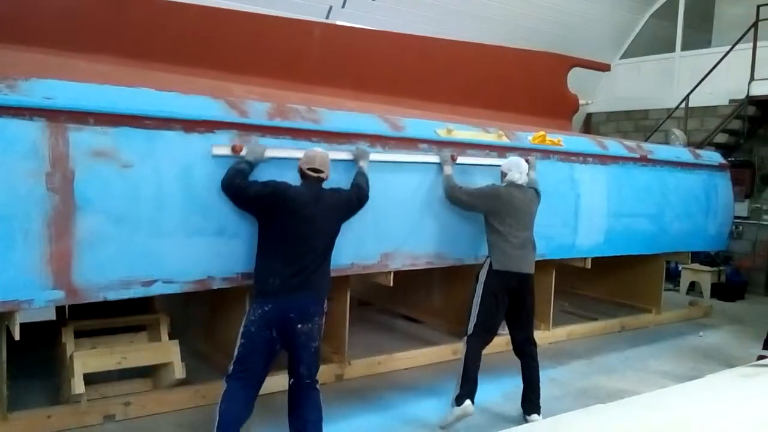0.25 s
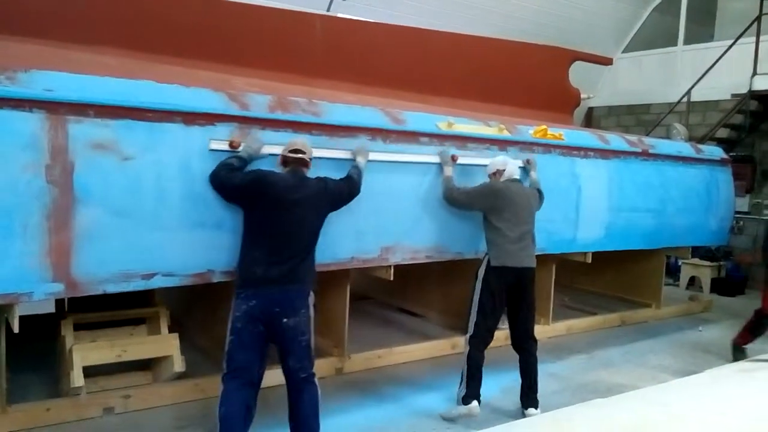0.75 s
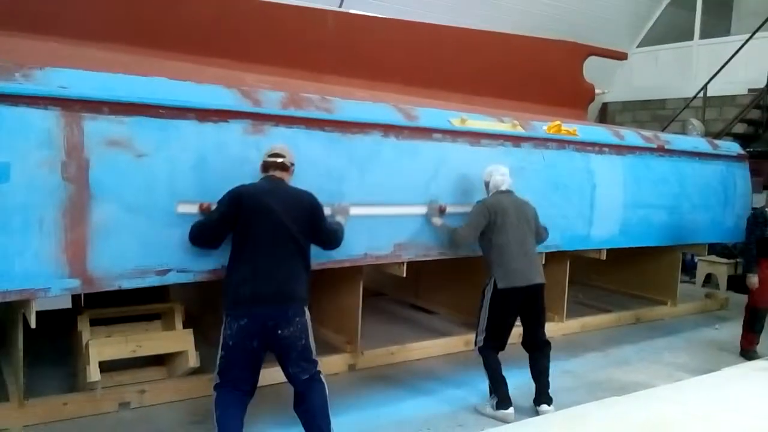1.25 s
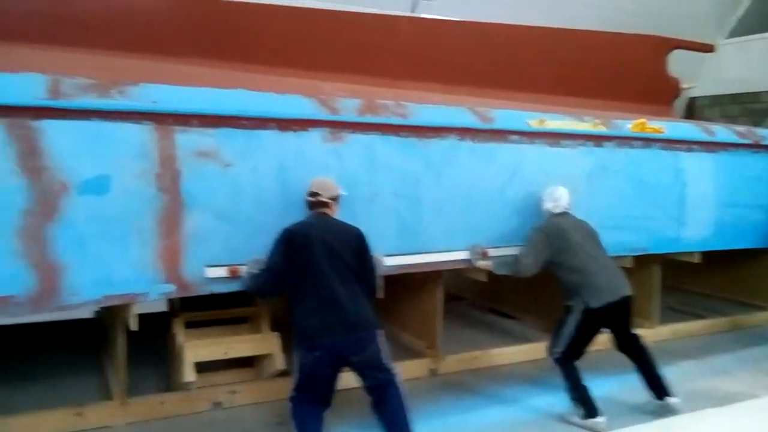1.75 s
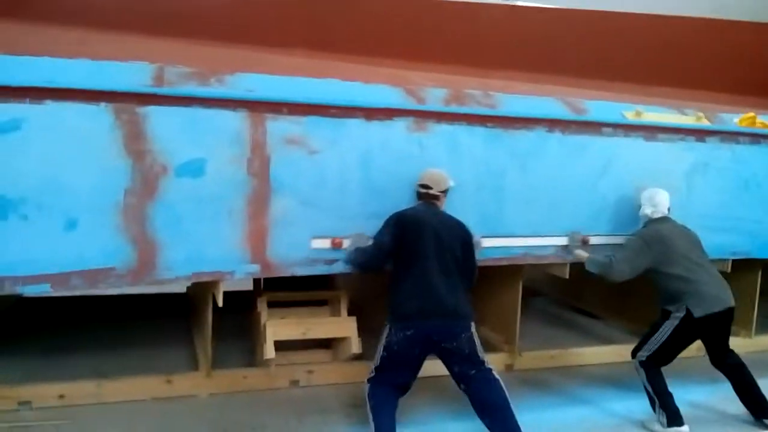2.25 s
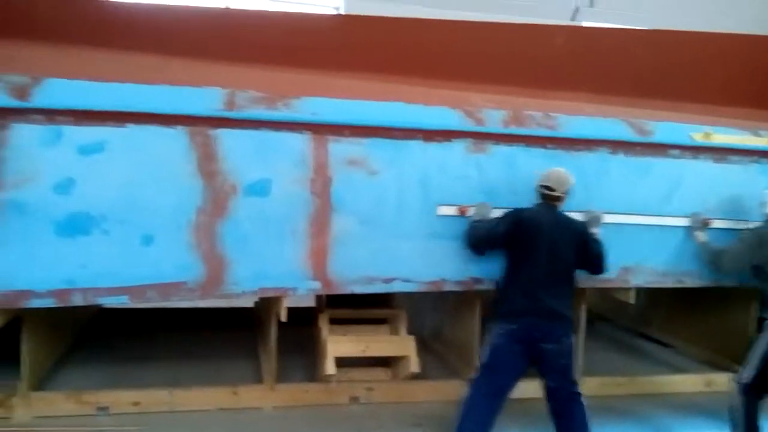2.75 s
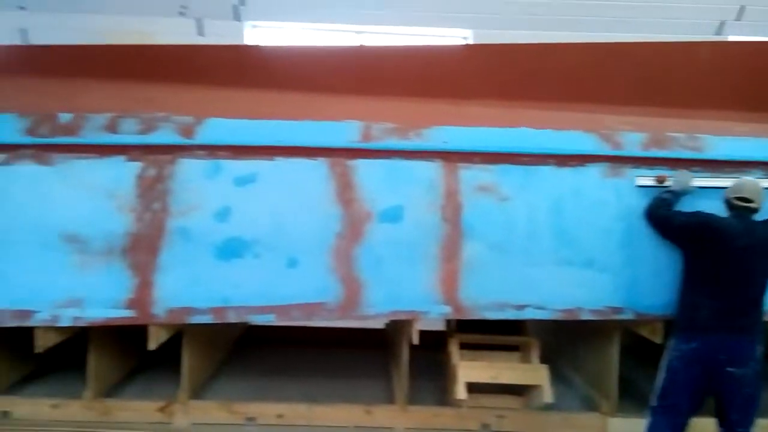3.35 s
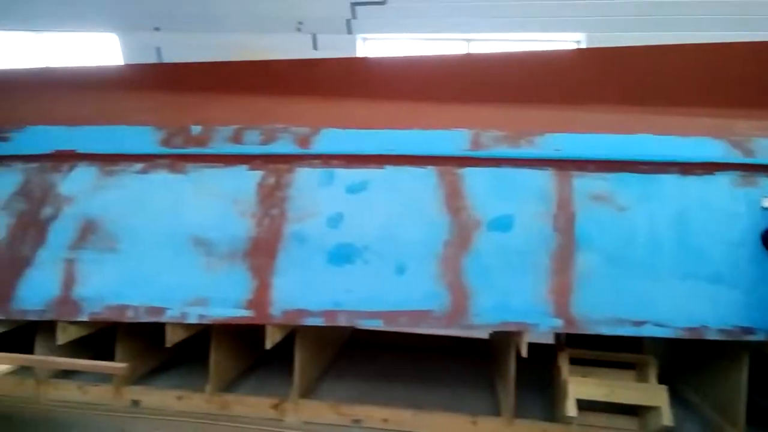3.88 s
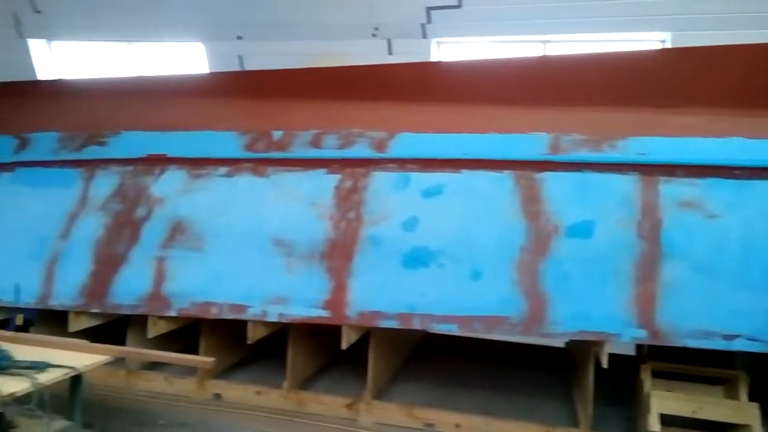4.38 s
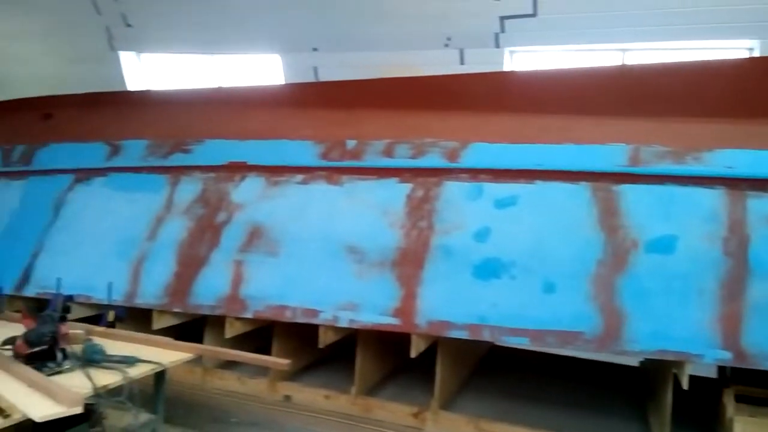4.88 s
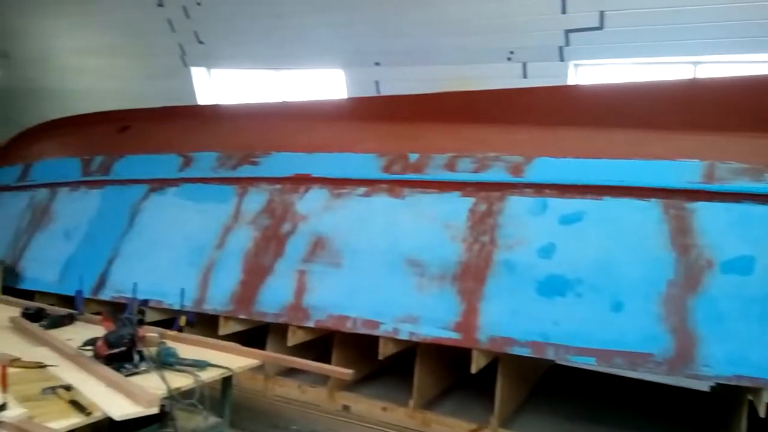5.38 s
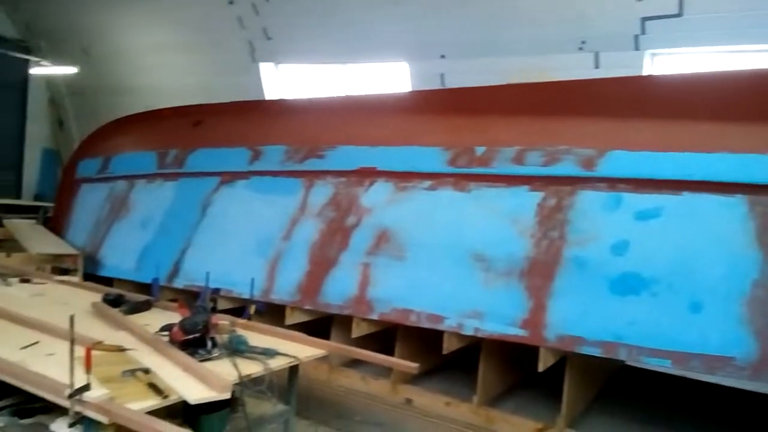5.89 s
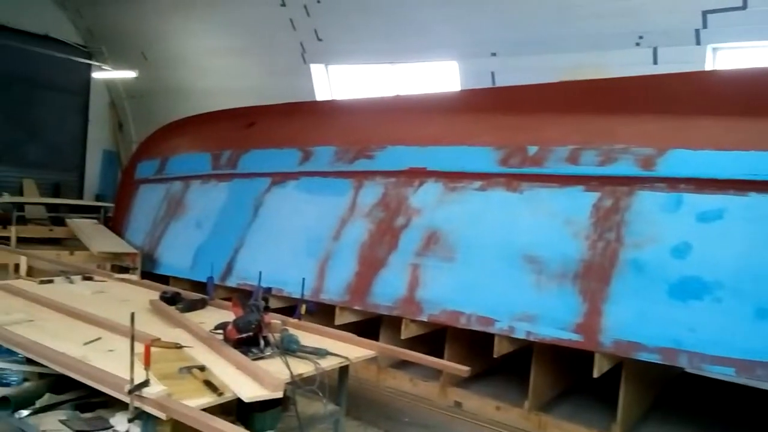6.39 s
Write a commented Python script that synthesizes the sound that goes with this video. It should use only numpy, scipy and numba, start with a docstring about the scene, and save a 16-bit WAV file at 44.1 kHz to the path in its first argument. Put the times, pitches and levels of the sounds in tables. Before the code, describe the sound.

Broad, dry sanding sweeps follow each other about every second and a half, with a faint low drumming of the hollow hull beneath. Strokes begin lightly, grow gritty and end abruptly, their echoes fading in the large shed. Midway the board snags, clacks twice or more and shudders. Slight scuffing touches and one very faint thin whistle fall in the turns. Heard from a moderate distance over quiet, steady room air.

```python
"""Sanding a boat hull

Two people push a long sanding board to and fro over the filler of a boat hull: five slow strokes in a big shed.
Each stroke lands lightly, bites, swells with speed and is pulled up; filtered grains rasp, hull modes drum.
On the third the board catches, knocks and judders (rung impulses, stick-slip jerks). A foot lands heavily once.
Decaying noise echoes fill the turns, over faint room noise and one thin whistle."""
import sys
import numpy as np
from scipy import signal
from scipy.fft import rfft, irfft, next_fast_len
from scipy.io import wavfile
from scipy.ndimage import uniform_filter1d
from numba import njit

SR = 44100
rng = np.random.default_rng(int(sys.argv[2]) if len(sys.argv) > 2 else 0)


def wrap_up_sound(samples):
    """Save the sound to the file named by the first command line argument, as 16-bit audio."""
    columns = np.atleast_2d(samples).T
    # keep every value between -1 and 1, then stretch to whole-number steps
    tamed = np.clip(columns, -1, 1)
    steps = np.round(tamed * 32767).astype(np.int16)
    wavfile.write(sys.argv[1], SR, steps)


N = 292383
T = np.arange(N) / SR

# light touches of the board at a few spots:
# (time [s], half length [s], level [dB], lowest ring [Hz], fine hiss re rasp [dB])
SPOT_TOUCHES = [(2.293, 0.057, -60.5, 2100, 0.5), (3.856, 0.094, -77, 2370, 17.5),
                (4.023, 0.053, -70, 1800, 7), (5.293, 0.063, -60, 1580, 4.5)]
# modes of board and hull shaken together: (frequency [Hz], width [Hz], relative level [dB])
SHAKEN_MODES = [(85, 20, -8), (125, 24, -9.5), (158, 26, -2), (240, 51, 1), (296, 32, 4.5), (370, 53, 0.5),
                (417, 37, 1.5), (484, 63, -3.5), (617, 78, -3), (749.6, 62, 3), (900, 100, -0.5),
                (1009, 75, 1.5), (1084.5, 104, -1), (1190, 35, 2.5), (1287, 180, -6.5), (1500, 160, -18),
                (1720, 57, 0)]


def sanding():
    """Thousands of grit tips tear at the filler; the long board grips unevenly along its length."""
    # grit heard through the board: (frequency [Hz], gain [dB])
    rasp_spectrum = [(240, -58.5), (400, -24), (466, -22.5), (503, -14.5), (808, -11), (956, -10),
                     (1730, -3), (1930, -2.5), (2580, -1.5), (3720, -3), (5210, -9), (6760, -18),
                     (8000, -18.5), (10500, -37), (15400, -43.5)]
    # the board's own rings: (frequency [Hz], width [Hz], mean level re rasp [dB])
    board_modes = [(743, 124, -8), (1476, 170, -17.5), (1710.5, 41, -11.5), (2215, 91, -10.5),
                   (2550, 110, -14), (3880, 61, -22)]
    # grit digs deeper or skips: (time [s], half length [s], added level [dB])
    digs = [(0.256, 0.028, 1.5), (1.106, 0.027, 2), (2.805, .055, 3.5), (4.205, 0.044, 1.5),
            (4.686, 0.018, -3.5), (5.454, 0.0227, 1.5)]
    # rings of the loosely held board: (multiple of the lowest ring [-])
    touch_ratios = (0.98, 1.78, 3.1)
    board_wander_db = 4
    sing_width_hz, sing_octaves_per_db = 700, 0.8  # strongest resonance sinks as the board slows
    # fine hiss re rasp: dB gained per dB of pressure or speed lost
    hiss_per_lightness, hiss_per_slowness = 0.52, 0.26
    touch_ring_db, touch_ring_width_hz = -2.5, 130

    landed, pressure_db, speed_db, (rasp_db, hollow_db, _, fine_db, hz, sing_db) = arms()
    fine_grit = grains(rate=16000, spread_db=3)
    coarse_grit = grains(rate=350, spread_db=2.0)
    grit = unit(fine_grit + undb(-11) * coarse_grit)
    grip_db = 0.43 * walk(rate=40) + 0.14 * walk(rate=14)
    tearing = colour(grit, rasp_spectrum)
    # the rings come and go as the contact moves
    rings = sum(ring(tearing, [mode]) * undb(board_wander_db * walk(rate=12)) for mode in board_modes)
    rasp = unit(tearing + rings) * undb(grip_db)
    hollow, rest = split(rasp, 1280)
    middle, hiss = split(rest, 8450)

    sing_hz = hz * 2 ** (sing_octaves_per_db * speed_db + 0.08 * walk(rate=6.2))
    singing = undb(sing_db) * moving_band(rasp, sing_hz, float(sing_width_hz))
    dig_db = sum(db * swell(centre, half_s) for centre, half_s, db in digs)
    # hollow register follows pressure alone, rasp pressure and speed; a light slow slide is mostly fine hiss
    fine = hiss * undb(fine_db - hiss_per_lightness * pressure_db - hiss_per_slowness * speed_db)
    bright = undb(rasp_db + speed_db) * (undb(dig_db) * (middle + singing) + fine)
    out = landed * undb(pressure_db) * (undb(hollow_db) * hollow + bright)

    for centre, half_s, db, touch_hz, hiss_db in SPOT_TOUCHES:
        modes = [(ratio * touch_hz, ratio * touch_ring_width_hz, touch_ring_db) for ratio in touch_ratios]
        loose = sum(ring(rasp, [mode]) for mode in modes)
        scrape = hollow + middle + loose + undb(hiss_db) * hiss
        out = out + undb(db) * swell(centre, half_s) * scrape
    return out


def arms():
    """Each stroke lands, is pressed home, speeds up, slows, brakes and lifts: pressure, speed and tone."""
    # strokes: (brake time [s], slide before it [s], pressing in [s], fastest before braking [s],
    # coasting after braking [s], slowing [dB/s^2], rasp [dB], hollow register [dB], hull drumming [dB],
    # fine hiss re rasp [dB], board resonance [Hz], resonance re rasp [dB])
    strokes = [(0.41, 1.0, .4, 0.34, 0.038, 45, -41, -45.5, -74, -4, 2350, -12.5),
               (1.809, 1.064, 0.35, 0.44, 0.04, 24.5, -44.5, -47.5, -71, -0.5, 3350, -13.5),
               (3.41, 1.193, .22, 0.42, 0.07, 22.5, -40, -42, -69.5, -1, 2240, -6.5),
               (4.85, 1.12, .39, 0.45, 0.083, 35, -46, -53.5, -74, 3.5, 2830, -5),
               (6.285, 0.9673, 0.1413, .25, 0.1027, 20.5, -41, -44.5, -67.5, -2, 2830, -13)]
    first_touch_db, release_db_per_s = -27, 184
    landing_s, brake_db, brake_s = 0.05, -7, 0.0372

    rows = np.array(strokes)
    starts = rows[:, 0] - rows[:, 1]
    current = np.searchsorted(starts[1:], T)
    brake, _, pressing, lead, coasting, slowing, *tone = rows[current].T
    start = starts[current]
    bite, fastest, lift = start + pressing, brake - lead, brake + coasting
    lightness = np.clip(1 - since(start) / pressing, 0, 1)
    pressure_db = first_touch_db * lightness - release_db_per_s * since(lift)
    slide_db = -slowing * np.square(np.clip(T, bite, lift) - fastest)
    speed_db = slide_db + brake_db * np.minimum(since(brake) / brake_s, 1)
    landed = np.minimum(since(start) / landing_s, 1)
    return landed, pressure_db, speed_db, tone


def reflections(x):
    """Hull and floor send back close copies; their lags drift, so the rasp's colour shifts."""
    touch_reflection = 0.17
    # few spots of contact give clearer reflections and a hollower scrape
    touching = sum(swell(centre, half_s) for centre, half_s, *_ in SPOT_TOUCHES)
    share = 0.09 + touch_reflection * touching
    mean_lags_s = (0.0013, 0.0023, 0.0037)
    copies = sum(delayed(x, lag_s * (1 + 0.069 * walk(rate=1.5))) for lag_s in mean_lags_s)
    return x + share * split(copies, 7600)[0]


def hull_drum():
    """Bumps in the filler shake the hull's panels, more so the harder the board bears on them."""
    # hollow hull under steady rubbing: (frequency [Hz], width [Hz], relative level [dB])
    hull_modes = [(104.8, 47, -16), (179.6, 32, 2), (217, 61, 0.5), (300, 54, 1), (389, 86, -3.5)]
    # soft bumps as the pair shift their weight: (time [s], level [dB])
    bumps = [(.47, -71), (.85, -70), (1.14, -65), (1.84, -65.5), (1.98, -71), (2.23, -76), (4.18, -66.5),
             (4.31, -67), (4.58, -67), (4.84, -68.5)]
    bump_half_s = 0.042
    drum_per_pressure, drum_wander_db = 0.58, 3  # dB per dB; unevenness

    landed, pressure_db, _, (_, _, drum_db, *_) = arms()
    panels = ring(grains(rate=1200, spread_db=4), hull_modes)
    panels = colour(panels, [(50, 0), (90, 2.5), (160, 0.5), (420, -0.5), (1000, 2)])
    rubbed_db = drum_db + drum_per_pressure * pressure_db + drum_wander_db * walk(rate=14)
    rubbed = landed * undb(rubbed_db)
    bumped = sum(undb(db) * swell(centre, bump_half_s) for centre, db in bumps)
    return unit(panels) * np.hypot(rubbed, bumped)


def judder():
    """After a catch the board sticks and slips in uneven jerks that ring board and hull, then die or lift."""
    # catches: (time [s], level [dB], decay [dB/s])
    catches = [(2.679, -40, 24.5), (2.955, -41, 49), (3.001, -34.5, 56.5)]
    rise_s = 0.0178

    _, pressure_db, _, _ = arms()
    jerk_hz = 36 * np.exp(0.3 * walk(rate=30))
    phase = np.cumsum(jerk_hz) / SR % 1
    jerks = (0.99 + np.exp(-phase / 0.14)) * grains(rate=5000, spread_db=3)
    body = ring(jerks, SHAKEN_MODES)
    body = colour(body, [(35, -28.5), (75, -8.5), (1800, 3.0), (4000, -5.5), (9000, -30)])
    shaking = []
    for start, db, fall in catches:
        rise = np.minimum(since(start) / rise_s, 1)
        shaking.append(rise * undb(db - fall * since(start)))
    return unit(body) * np.linalg.norm(shaking, axis=0) * undb(pressure_db)


def knocks():
    """The board's edge clacks on the hull and bounces once; the panels' boom swells more slowly."""
    # knocks, peaks before the shed mix:
    # (time [s], clack peak [dB], clack pitch [Hz], first ring width [Hz], boom peak [dB])
    hull_knocks = [(2.691, -27, 839, 170, -35), (2.952, -21, 1020, 418, -27.5),
                   (3.015, -38, 766, 260, -31.5), (3.051, -26.5, 1120, 600, -33)]
    bounce_s = 0.00436
    out = np.zeros(N)
    for start, clack_db, hz, width, boom_db in hull_knocks:
        blow = signal.unit_impulse(SR // 2) + 0.047 * contact(rise_s=0.0017)
        rung = ring(blow, [(hz, width, 0)])
        clack = peak(ring(rung, [(hz, 1.3 * width, 0)]), clack_db)
        add(out, start, clack)
        add(out, start + bounce_s, 0.75 * clack)
        panels, _ = split(ring(contact(rise_s=0.0081), SHAKEN_MODES), 1244)
        add(out, start, peak(panels, boom_db))
    return out


def steps():
    """One heavy footfall: soft rough contacts ring the floor's low modes in close succession."""
    # contacts of the foot, peaks before the shed mix: (time [s], peak [dB])
    footfalls = [(1.716, -51), (1.744, -55.5), (1.803, -56)]
    floor = [(86.5, 25, -1), (126.6, 24.5, 1.0), (169, 52, -1)]
    out = np.zeros(N)
    for start, db in footfalls:
        thump, _ = split(ring(contact(rise_s=0.012), floor), 273)
        add(out, start, peak(thump, db))
    return out


def whistle():
    """A faint thin whistle, a slightly unsteady sine, in the turn before the third stroke."""
    hz = 8410 + 6 * walk(rate=40)
    tone = np.sin(2 * np.pi * np.cumsum(hz) / SR)
    return undb(-92) * swell(2.125, 0.094) * tone


def shed(x, wet_db, count=1):
    """Direct sound plus echo at constant power; a moving source passes through count echo patterns."""
    place = np.linspace(0, count - 1, N)
    echo = np.zeros(N)
    for k in range(count):
        share = np.sqrt(np.maximum(1 - np.abs(place - k), 0))
        echo += signal.oaconvolve(x * share, shed_tail())[:N]
    return (x + undb(wet_db) * echo) / np.hypot(1, undb(wet_db))


def shed_tail():
    """One diffuse echo of the shed, energy near 1; its treble dies first."""
    t60_low_s, t60_mid_s, t60_top_s = 0.95, 0.78, 0.25
    t = T[:SR]
    low, rest = split(rng.standard_normal(SR), 850)
    mid, top = split(rest, 3700)
    bands = ((low, t60_low_s), (mid, t60_mid_s), (top, t60_top_s))
    tail = sum(band * np.exp(-np.log(1000) * t / t60_s) for band, t60_s in bands)
    build_up = np.clip(t / 0.015, 0, 1)
    return tail * build_up * np.sqrt(2 * np.log(1000) / (t60_mid_s * SR))


def air():
    """Faint room noise, nearly steady: coloured noise with a slow level wander."""
    # still air of the shed: (frequency [Hz], gain [dB])
    air_spectrum = [(25, 4.5), (60, -24), (120, -12), (200, -1.5), (450, -7), (1000, -7), (2500, -7.5),
                    (5000, -16.5), (8000, -23.5), (10500, -40), (15500, -38)]
    mean_db = -72.5
    wander_db = 0.6 * walk(rate=3.5)
    return unit(colour(rng.standard_normal(N), air_spectrum)) * undb(mean_db + wander_db)


def undb(db):
    """Decibels to gain."""
    return 10 ** (np.asarray(db) / 20)


def unit(x):
    """Scale to rms 1."""
    return x / np.sqrt(np.mean(x ** 2))


def peak(x, db):
    """Scale to a peak level."""
    return x * undb(db) / np.max(np.abs(x))


def walk(rate):
    """Slow random wander, rms 1: random steps, rate a second, smoothed twice."""
    k = max(int(SR / rate), 1)
    held = np.repeat(rng.standard_normal(N // k + 1), k)
    return unit(uniform_filter1d(uniform_filter1d(held, k), k)[:N])


def grains(rate, spread_db):
    """Tiny impacts at random moments, rate a second, of scattered size and either sign."""
    hit = rng.random(N) < rate / SR
    sign = np.sign(rng.standard_normal(N))
    return unit(hit * sign * undb(spread_db * rng.standard_normal(N)))


def contact(rise_s):
    """A short rough push: noise under an envelope that swells to 1 and dies away."""
    age = T[:SR // 2] / rise_s
    return age * np.exp(1 - age) * rng.standard_normal(len(age))


def colour(x, points):
    """Filter by a spectrum of (frequency [Hz], gain [dB]) points."""
    hz, db = np.transpose(points)
    size = next_fast_len(len(x) + SR // 10)
    f = np.maximum(np.fft.rfftfreq(size, 1 / SR), 1)
    gain = undb(np.interp(np.log(f), np.log(hz), db))
    return irfft(rfft(x, size) * gain, size)[:len(x)]


def split(x, hz):
    """The parts below and above a frequency; they sum to the whole."""
    lowpass = signal.butter(2, min(hz, SR / 2 - 1), fs=SR, output="sos")
    low = signal.sosfiltfilt(lowpass, x)
    return low, x - low


def ring(x, modes):
    """Drive damped resonances (Hz, width Hz, dB); neighbours swing in opposite senses."""
    out = np.zeros(len(x))
    for k, (hz, width, db) in enumerate(modes):
        b, a = signal.iirpeak(hz, hz / width, SR)
        out += (-1) ** k * undb(db) * signal.lfilter(b, a, x)
    return out


@njit
def moving_band(x, hz, width):
    """A resonance whose centre moves; gain 1 at the centre."""
    y, b, l = np.empty(len(x)), 0., 0.  # output, band and low-pass states
    for i in range(len(x)):
        g, k = np.tan(np.pi * hz[i] / SR), width / hz[i]
        v = (b + g * (x[i] - l)) / (1 + g * (g + k))
        b, l, y[i] = 2 * v - b, l + 2 * g * v, k * v
    return y


def delayed(x, lag_s):
    """The sound a fixed or moving lag later."""
    return np.interp(T - lag_s, T, x)


def swell(centre, half_s):
    """A flat-topped window in time."""
    return np.exp(-((T - centre) / half_s) ** 4)


def since(start):
    """Seconds since a moment; zero before it."""
    return np.maximum(T - start, 0)


def add(out, start, sound):
    """Mix a short sound in at a time."""
    i = int(start * SR)
    out[i:i + len(sound)] += sound[:N - i]


def scene():
    """All sources in the shed; rubbing travels through six echo patterns, thumps share one."""
    rubbing = reflections(shed(sanding(), wet_db=-7.5, count=6))
    thumps = shed(hull_drum() + judder() + knocks() + steps(), wet_db=-9.0)
    return (rubbing + thumps + whistle() + air())[None]


def record(dry):
    """A steep elliptic low-pass cuts the top."""
    top_hz = 15500
    lowpass = signal.ellip(10, 0.2, 70, top_hz, fs=SR, output="sos")
    return signal.sosfilt(lowpass, dry)


dry = scene()
out = record(dry)
wrap_up_sound(out)
```